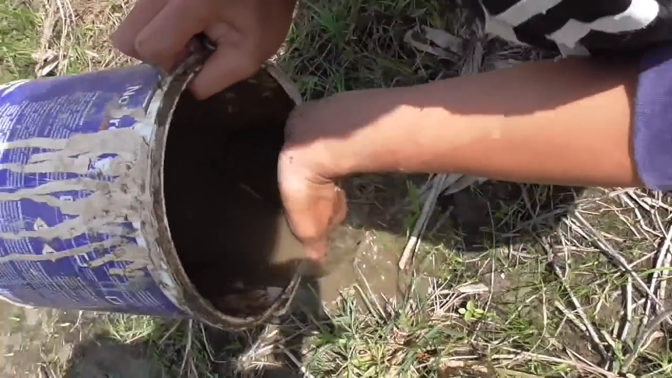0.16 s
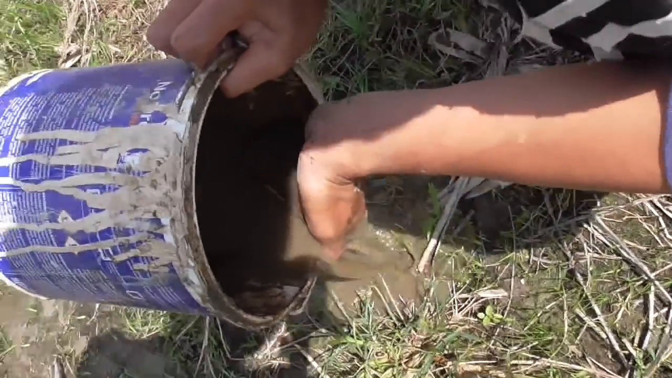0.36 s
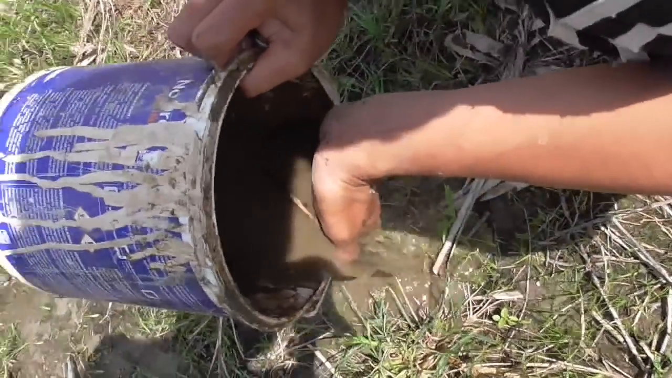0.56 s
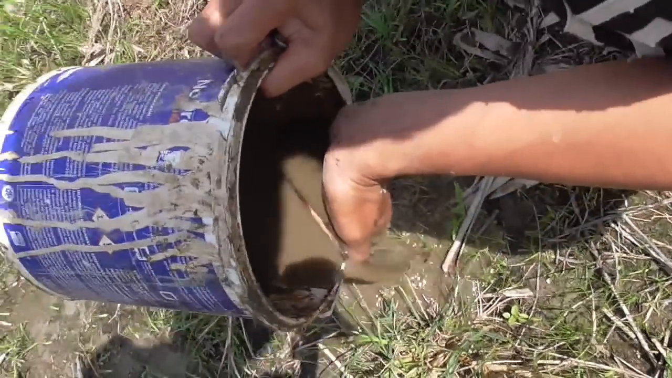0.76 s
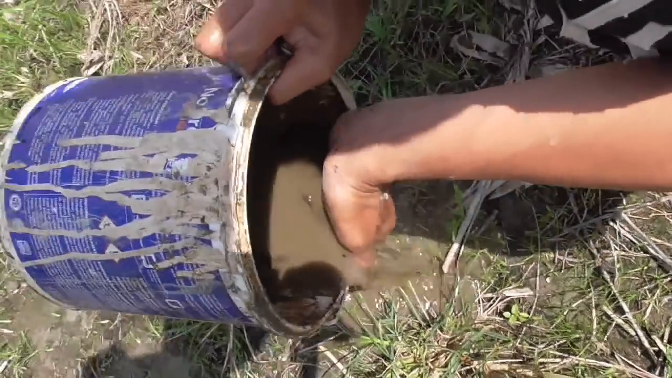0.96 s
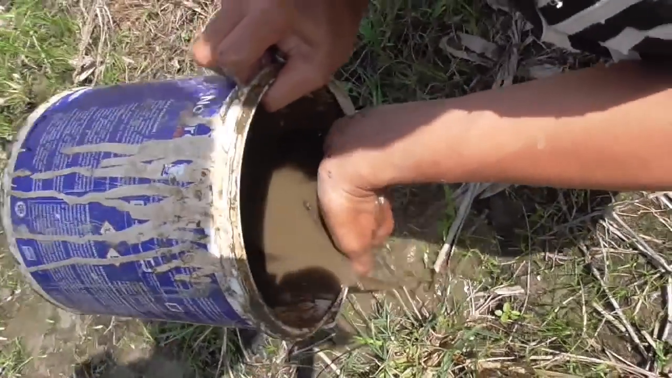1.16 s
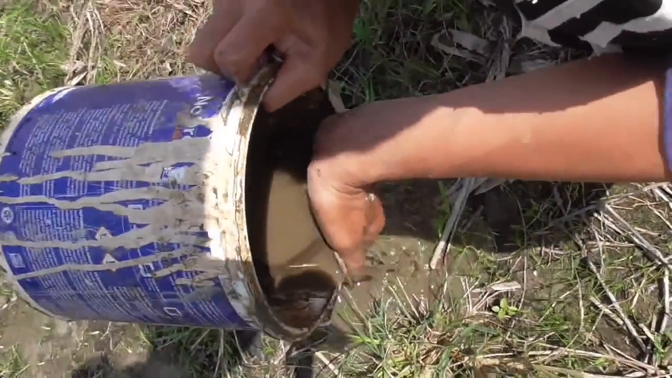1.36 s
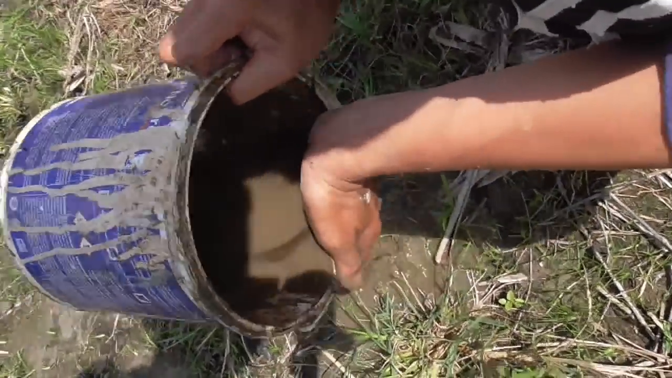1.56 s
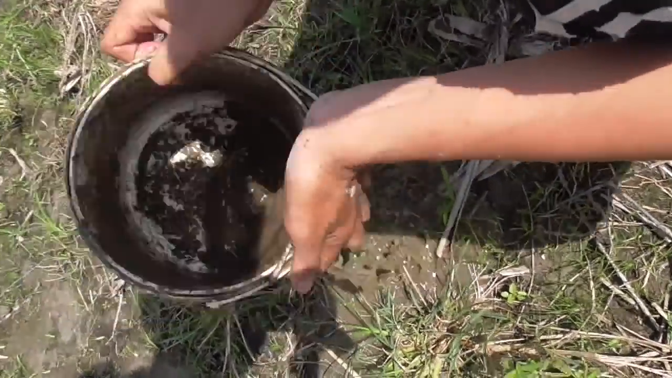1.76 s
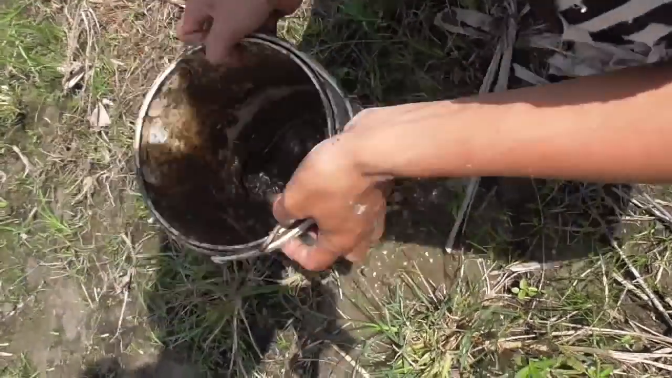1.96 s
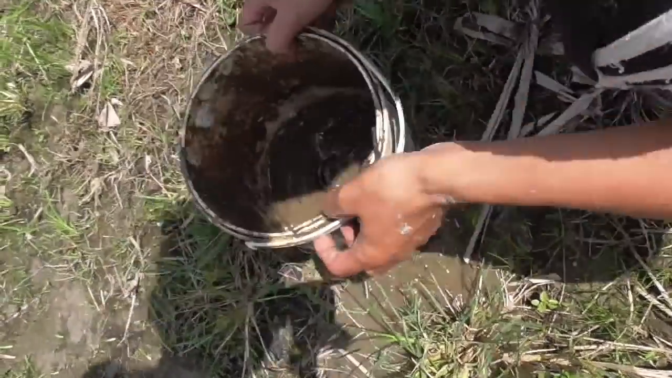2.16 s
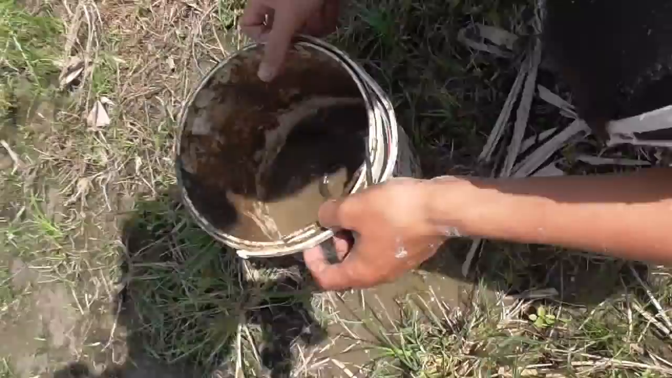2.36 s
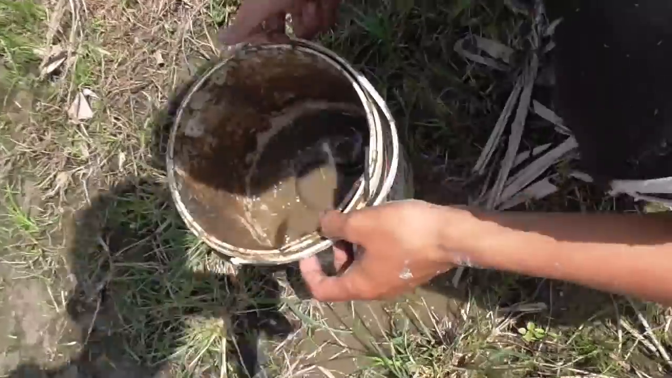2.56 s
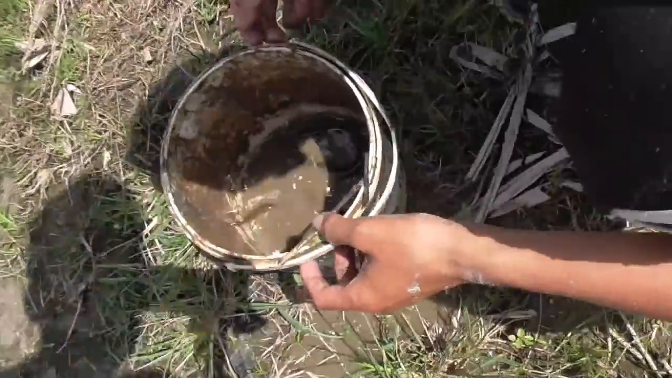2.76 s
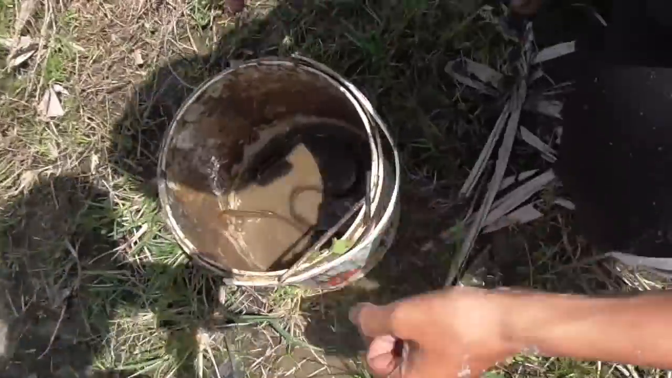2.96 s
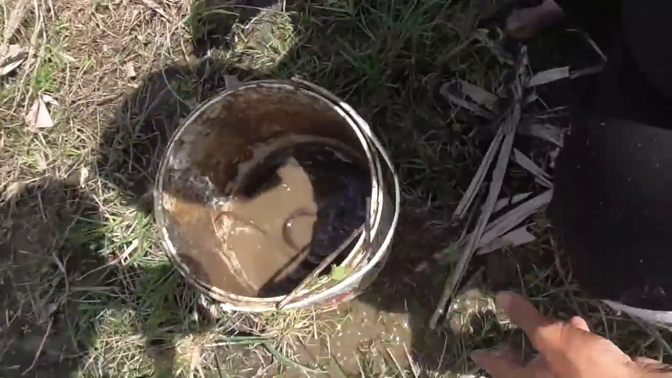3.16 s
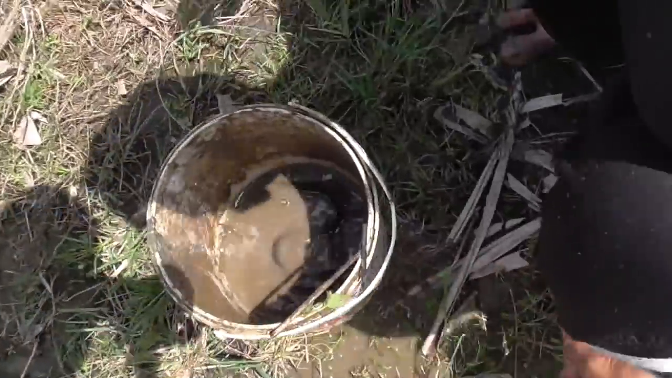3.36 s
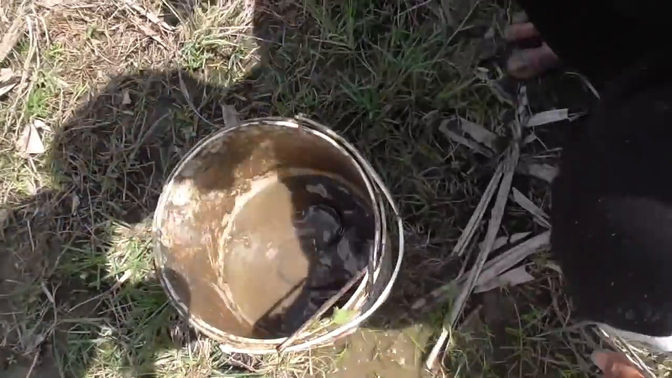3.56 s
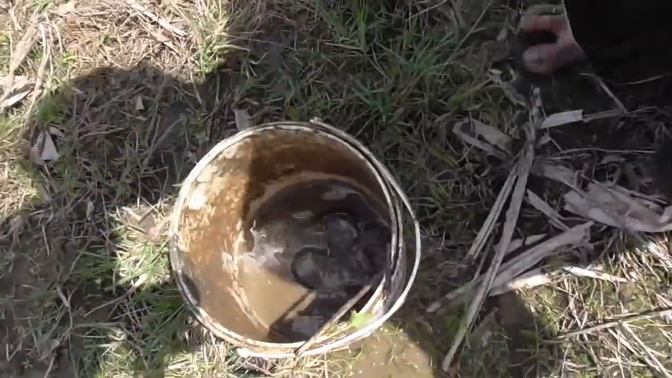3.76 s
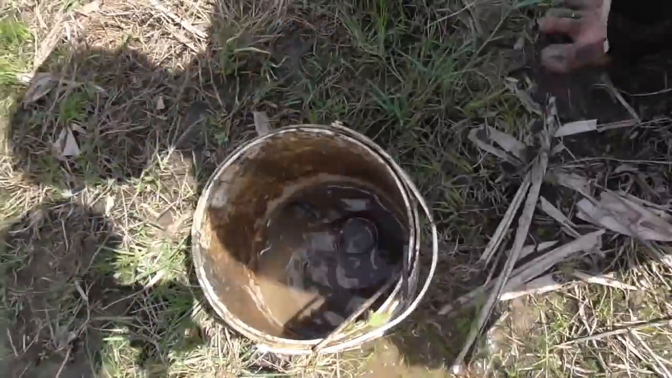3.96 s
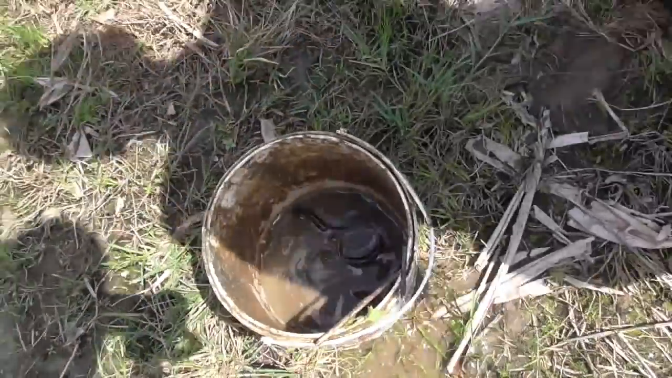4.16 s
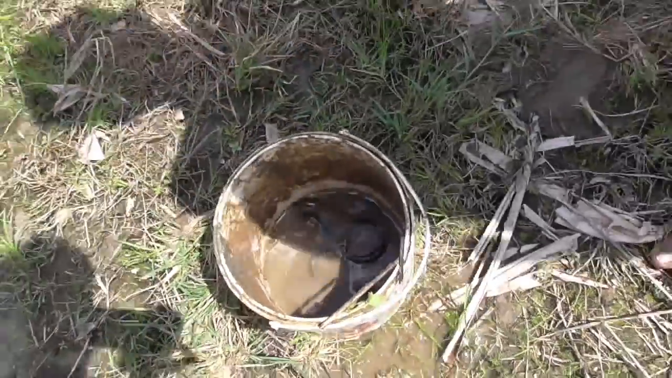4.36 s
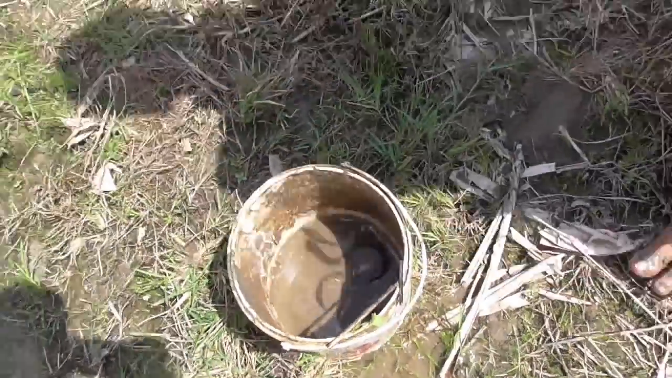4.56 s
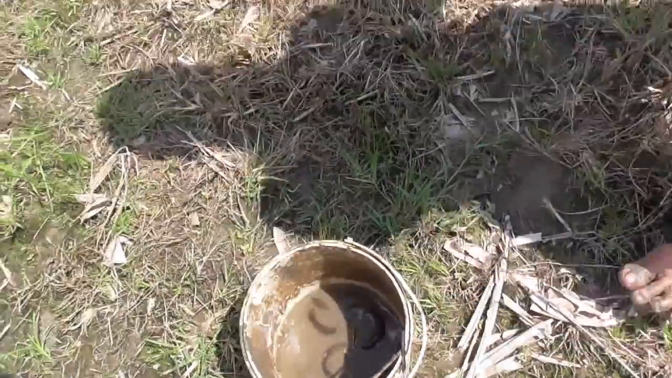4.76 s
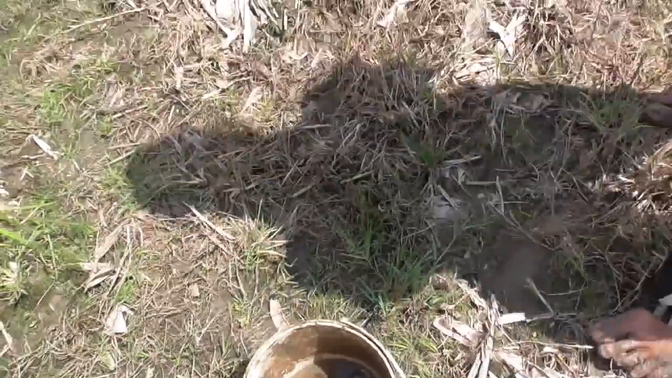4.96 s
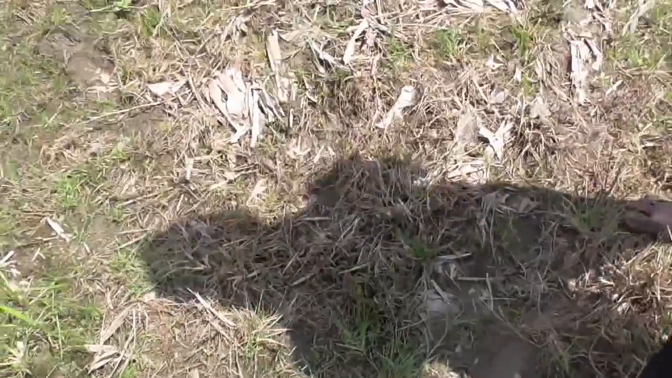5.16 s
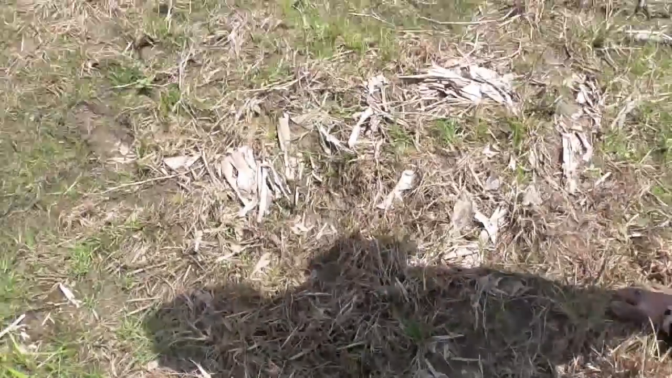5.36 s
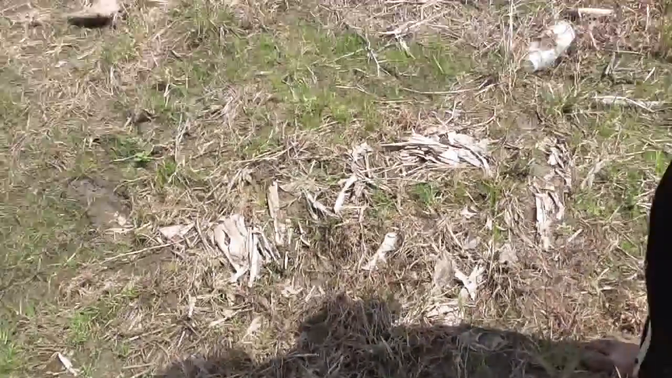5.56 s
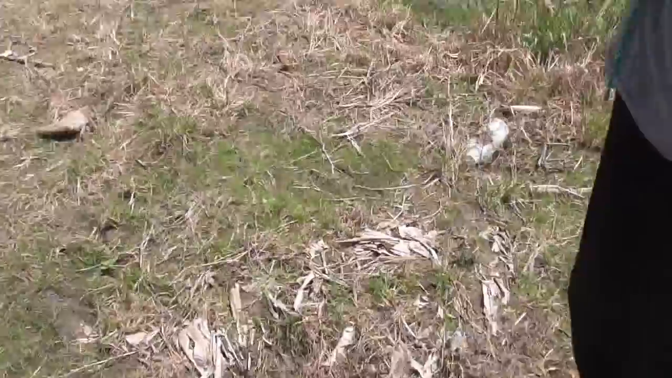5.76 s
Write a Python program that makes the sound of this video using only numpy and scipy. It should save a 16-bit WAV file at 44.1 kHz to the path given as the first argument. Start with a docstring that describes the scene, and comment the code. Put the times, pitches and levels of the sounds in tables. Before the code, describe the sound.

Muddy water pours and spatters from a plastic bucket, sloshes as it is set down with a hollow knock, then clothes rustle.

```python
"""In a field, with an engine droning far away, muddy water is poured from a plastic bucket over a hand.
It spatters on wet ground: drops crack, bubbles ring and the hollow bucket gurgles. Near 2 s the bucket
is righted, its handle slips on the rim, and the water slaps and glugs inside. Among a few last drips it
is set down with a hollow knock at 3.6 s. Then the people get up: clothes rustle, dry stalks crunch
and plastic knocks close by."""
import sys
import numpy as np
from scipy import signal
from scipy.fft import rfft, irfft, next_fast_len
from scipy.io import wavfile
from scipy.ndimage import map_coordinates

SR = 44100
rng = np.random.default_rng(int(sys.argv[2]) if len(sys.argv) > 2 else 0)


def dump_mix(stems):
    """Bounce the given channels to the path in sys.argv[1] as a 16-bit WAV at rate SR."""
    frames = np.atleast_2d(stems).T  # one column per channel
    limited = np.clip(frames, -1, 1)  # hard clip at full scale
    pcm = np.round(limited * 32767).astype(np.int16)
    wavfile.write(sys.argv[1], SR, pcm)


N = 255780
TIME = np.arange(N) / SR


def from_db(db):
    return 10 ** (np.asarray(db) / 20)


def rms_one(x):
    return x / np.sqrt(np.mean(x ** 2) + 1e-20)


def drift(per_s):
    """A random control curve with an RMS of 1 and per_s turning points a second."""
    points = rng.standard_normal(4000)
    return rms_one(np.interp(TIME * per_s, np.arange(len(points)), points))


def butter(x, hz, kind):
    """A gentle low-, high- or band-pass, 12 dB an octave."""
    return signal.sosfilt(signal.butter(2, hz, kind, fs=SR, output="sos"), x)


def eq(x, curve):
    """A minimum-phase EQ along rows of (freq_hz, gain_db), so clicks have no pre-ring."""
    size = next_fast_len(N + 8192)
    hz, db = np.transpose(curve)
    grid_hz = np.maximum(np.arange(size // 2 + 1) * SR / size, 1)
    gain = from_db(np.interp(np.log(grid_hz), np.log(hz), db))
    cepstrum = irfft(np.log(gain), size)
    cepstrum[1:size // 2] *= 2
    cepstrum[size // 2 + 1:] = 0
    return irfft(rfft(x, size) * np.exp(rfft(cepstrum)), size)[..., :N]


def ring(x, hz, t60):
    """One mode: a unit click sets a sine of height 1 ringing."""
    radius = from_db(-60 / (t60 * SR))
    angle = 2 * np.pi * min(hz, .45 * SR) / SR
    return signal.lfilter([0, np.sin(angle)], [1, -2 * radius * np.cos(angle), radius ** 2], x + 1e-18)


def resonance(x, hz, *widths_hz):
    """Band-passes in series, one for each width, with unity gain at the centre."""
    for width in widths_hz:
        radius = np.exp(-np.pi * width / SR)
        poles = [1, -2 * radius * np.cos(2 * np.pi * hz / SR), radius ** 2]
        x = signal.lfilter(np.array([1, 0, -1]) * (1 - radius ** 2) / 2, poles, x + 1e-18)
    return x


def pan(db):
    """Left and right gains for a level difference; positive is to the left."""
    gains = from_db([[db / 2], [-db / 2]])
    return gains / gains.mean()


def wide_noise(side_db, size=N):
    """Mid-side white noise; side_db sets the stereo width."""
    mid, side = rng.standard_normal((2, size))
    return mid + from_db(side_db) * side * [[1], [-1]]


def grains(per_s, spread_db, scatter):
    """Random clicks of uneven size, each with its own pan."""
    at = np.flatnonzero(rng.random(N) < per_s / SR)
    size, sign, side = rng.random((30000, 3))[np.arange(len(at)) % 30000].T
    height = from_db(spread_db * np.minimum(-np.log(1 - size), 3.5)) * np.sign(sign - .5)
    out = np.zeros((2, N))
    out[:, at] = height * (1 + scatter * 2 * (2 * side - 1) * np.array([[1], [-1]]))
    return out


def spurts(per_s, decay_s):
    """An envelope of random bursts, each with a hard attack and a short decay."""
    triggers = np.abs(grains(per_s, spread_db=3.0, scatter=.15))
    return rms_one(signal.lfilter([1], [1, -np.exp(-1 / (decay_s * SR))], triggers + 1e-18))


def swell(crest_s, db, rise_s, fade_s):
    """An envelope with a rounded crest between a gradual rise and fall."""
    distance = np.abs(TIME - crest_s) / np.where(TIME < crest_s, rise_s, fade_s)
    return from_db(db) / np.cosh(np.minimum(distance, 40))


def wander(x, octaves, per_s):
    """Random varispeed: the pitch strays a little up and down."""
    speed = 2 ** (octaves * drift(per_s))
    position = np.cumsum(speed / speed.mean())
    return np.array([map_coordinates(side, [position], order=3, mode="nearest") for side in x])


def add(out, start_s, sound):
    """Mix a sound in at its cue."""
    at = max(int(start_s * SR), 0)
    out[:, at:at + sound.shape[-1]] += sound[..., :N - at]


def reflections(x, t60, wet_db, side_db):
    """Adds short diffuse reflections off the bucket, the ground and the bodies."""
    t = TIME[:4096]
    tail = wide_noise(side_db, len(t)) * from_db(-60 * t / t60) * np.minimum(t / .001, 1)
    tail /= np.sqrt(np.sum(tail ** 2) / 2)
    return x + from_db(wet_db) * signal.fftconvolve(x, tail, axes=1)[:, :N]


# Low bed of open air: freq_hz, gain_db
MURMUR_EQ = [(25, -2), (50, -19), (70, -8.5), (115, -1.5), (190, -1.5), (260, -0.5), (400, -7.5),
             (670, -7.5), (1000, -13.5), (1400, -14.5), (2000, -35), (4000, -38)]
# Thin, airy top: freq_hz, gain_db
HISS_EQ = [(900, -39), (1900, -6.5), (2700, -10), (3500, -5), (4900, -5), (6300, -10.5), (7200, -3.5),
           (7800, 2), (8400, 1), (8900, 5.5), (9400, -3.5), (12500, -4.5), (14500, -11), (16000, -42)]
# Partials of the far engine: pitch_hz, level_db
ENGINE_PARTIALS = [(62, -62), (103, -55.5), (122.5, -50.5), (150.5, -52), (179.5, -51.5), (242, -57.5)]
def field(hiss_fall_s=5.3, hiss_fall_db=-2.5):
    """Open air murmurs, a far engine wavers, and a thin hiss sinks a little at the end."""
    murmur = from_db(-45.5) * rms_one(eq(wide_noise(side_db=-3.0), MURMUR_EQ))
    hiss = from_db(-47.5) * rms_one(eq(wide_noise(side_db=-0.5), HISS_EQ))
    hiss *= from_db(hiss_fall_db * np.clip((TIME - hiss_fall_s) / 0.12, 0, 1))
    drone = 0
    for hz, db in ENGINE_PARTIALS:
        level = from_db(db + 3.0 * drift(12))
        wavering_hz = hz + 3.58 * drift(18)
        drone += level * np.sin(2 * np.pi * np.cumsum(wavering_hz) / SR)
    return (murmur + drone) * pan(-0.66) + hiss


# Stalks crushed underfoot: start_s, level_db, pitch_hz
STALK_CRUNCHES = [(4.622, -27, 8200), (4.671, -23, 9000), (4.684, -23, 8800), (4.742, -29, 10900),
                  (4.792, -32, 10000), (5.193, -30, 10500), (5.288, -33, 10000)]
def stalks(attack_s=0.00088, decay_s=.003, width_hz=2600):
    """A dry stalk gives way with a short, thin crunch."""
    out, t = np.zeros((2, N)), TIME[:2000]
    envelope = np.exp(-t / decay_s) * (1 - np.exp(-t / attack_s))
    for start_s, db, hz in STALK_CRUNCHES:
        crunch = rms_one(resonance(wide_noise(side_db=3, size=len(t)), hz, width_hz, 2 * width_hz))
        add(out, start_s, from_db(db) * crunch * envelope)
    return out


# Tone of rubbing fabric: freq_hz, gain_db
CLOTH_EQ = [(250, -23), (600, 6), (1350, 1), (1900, -2.5), (2700, -2.5), (3700, 2.5), (4800, 0.5),
            (6200, -3), (8500, 0), (12000, -7.5), (15300, -11), (16000, -33)]
# Body moves, fastest at the crest: crest_s, level_db, rise_s, fade_s, crisp_db
CLOTH_MOVES = [(3.57, -41, 0.061, 0.16, -1), (3.769, -45, 0.024, 0.041, 1), (4.26, -42, 0.079, 0.13, 9.5),
               (4.41, -43, 0.028, 0.092, 11.5), (4.515, -38.5, 0.038, 0.038, 10),
               (4.62, -45.5, 0.048, 0.11, 6), (4.88, -44, 0.034, 0.038, 6), (4.95, -41.5, 0.015, 0.019, 0),
               (5.10, -49.5, 0.035, 0.057, -4), (5.212, -38.5, 0.016, 0.023, 4),
               (5.255, -41.5, 0.02, 0.036, 6)]
def clothes(crisp_hz=9000, flutter_db=1.0, snag_db=-7):
    """Cloth slides on cloth: a hiss swells with each move, some crisper, and snagging fibres tick."""
    rub_power = crisp_power = 0
    for crest_s, db, rise_s, fade_s, crisp_db in CLOTH_MOVES:
        rub_power += swell(crest_s, db, rise_s, fade_s) ** 2
        crisp_power += swell(crest_s, db + crisp_db, rise_s, fade_s) ** 2
    hiss = rms_one(eq(wide_noise(side_db=-4.0), CLOTH_EQ))
    top = signal.sosfiltfilt(signal.butter(2, crisp_hz, "high", fs=SR, output="sos"), hiss)
    ticks = wide_noise(side_db=-3.5) * spurts(per_s=120, decay_s=.0006)
    snags = from_db(snag_db) * rms_one(eq(ticks, SPATTER_EQ))
    rustle = np.sqrt(rub_power) * (hiss + snags) + np.sqrt(crisp_power) * top
    return rustle * from_db(flutter_db * drift(80))


# Body modes of the plastic: pitch_hz, gain_db, t60_s
PLASTIC_MODES = [(262, -8.5, 0.059), (360, -16, 0.11), (610, -4.5, 0.048), (699.4, -13.5, 0.11),
                 (895, -10.5, 0.11), (1200, -8, 0.019), (1365, -5.5, 0.049), (1310, 1, 0.0052),
                 (1770, -25, 0.028), (2300, 10, 0.0059), (4360, -17, 0.011)]
# Hits on plastic: start_s, level_db, contact_hz, pan_db, ring_db, t60_ratio
PLASTIC_HITS = [(3.6146, 1.5, 1400, -7.5, 6, 0.26), (3.6203, -2.5, 1640, -10, -3.5, 0.83),
                (3.6264, -4, 1350, 3, -32, 0.5), (3.853, -25, 975, -8, 2, 0.69),
                (4.055, -20, 476, -5, 2, .6), (4.125, -16.5, 1010, -9, 3.5, 0.46),
                (4.61, -23.5, 660, -5, 5, 1), (4.6817, -16.5, 700, -2, 4, 0.76),
                (4.7352, -11, 1290, -7, -0.5, 0.73), (4.844, -10, 744, -10.5, 3, 0.83),
                (4.8456, -12, 1340, -9, -1.5, 0.44), (4.971, -22, 790, -6, 2.5, 1.8)]
def knocks(contact_t60=0.0094, body_db=-7, contact_db=-1, crack_db=-23, left_lag_s=.00007):
    """A short contact pulse, duller when soft, sets the plastic ringing; hard blows add a crack."""
    out, t = np.zeros((2, N)), TIME[:12000]
    click = signal.unit_impulse(len(t))
    for start_s, db, hz, pan_db, ring_db, t60_ratio in PLASTIC_HITS:
        pulse = butter(click, 0.71 * hz, "low")
        body = sum((-1) ** k * from_db(mode_db) * ring(pulse, mode_hz, t60_ratio * t60)
                   for k, (mode_hz, mode_db, t60) in enumerate(PLASTIC_MODES))
        contact = butter(ring(click, hz, contact_t60), 2500, "low")
        crack = rms_one(resonance(rng.standard_normal(len(t)), 1400, 2100)) * np.exp(-t / 0.0075)
        hit = from_db(body_db + ring_db) * body + from_db(contact_db) * contact
        hit += from_db(crack_db + db) * crack
        add(out, start_s, from_db(db) * hit * pan(pan_db))
    out = butter(out, 180, "high")
    out[0] = np.interp(TIME - left_lag_s, TIME, out[0])
    return reflections(out, t60=.11, wet_db=-11, side_db=-6)


# Hollow resonances of the rim: pitch_hz, width_hz, gain_db
RIM_MODES = [(1260, 140, -5.5), (2110, 160, -1.5), (3500, 1200, -4.5), (4960, 240, -4), (6800, 440, -6)]
# Handle slips as the bucket is righted: start_s, level_db, decay_s
HANDLE_SLIPS = [(1.923, -38, 0.021), (1.9475, -21.5, 0.0028), (1.957, -26, .008)]
def handle(attack_s=0.00032):
    """The handle slips on the rim: each short, gritty scrape excites the same resonances."""
    slips, t = np.zeros((2, N)), TIME[:6000]
    for start_s, db, decay_s in HANDLE_SLIPS:
        envelope = np.exp(-t / decay_s) * (1 - np.exp(-t / attack_s))
        add(slips, start_s, from_db(db) * wide_noise(side_db=-8, size=len(t)) * envelope)
    return sum(from_db(db) * np.sqrt(SR / width) * resonance(slips, hz, width, 2 * width)
               for hz, width, db in RIM_MODES)


# Hollow tone of water in the bucket: freq_hz, gain_db
SWIRL_EQ = [(120, -30.5), (250, -4.5), (350, -7.5), (470, 4), (580, -5), (720, -2.5), (1000, -9),
            (1300, -12.5), (1800, -23), (3000, -26.5)]
# Waves as the bucket is moved: crest_s, level_db, rise_s, fade_s
BUCKET_WAVES = [(.05, -38.5, 0.2, 0.14), (2.2, -41, 0.29, 0.49), (2.98, -45, 0.079, 0.22),
                (3.6, -36.5, 0.13, 0.17), (4.68, -46, 0.061, 0.34)]
def swirl(pour_wash_db=-52.5):
    """Thick water washes softly round the bucket, during the pour and with each wave."""
    flow_db, gate = flow()
    pouring = from_db(pour_wash_db + flow_db) * gate
    envelope = np.sqrt(pouring ** 2 + sum(swell(*wave) ** 2 for wave in BUCKET_WAVES))
    lumps = from_db(1.3 * drift(35))
    wash = rms_one(eq(wide_noise(side_db=-8.5), SWIRL_EQ))
    return wash * envelope * lumps * pan(-4.0)


# Hollow glugs and thumps of the bucket: start_s, level_db, pitch_hz, t60_s, thump_db, pan_db
BUCKET_GLUGS = [(1.8485, -17.5, 860, 0.0098, -31, 4), (1.853, -24.5, 410, 0.055, -30, 3),
                (2.0962, -7, 550, 0.016, -52, 2.5), (2.544, -21.5, 674, 0.06, -39, -6),
                (2.549, -10.5, 734, 0.0083, -41, -6), (3.9696, -1.5, 440, 0.016, -19, -4)]
def glugs(attack_s=0.00047, chirp_per_s=0.83, thump_hz=95, band_hz=(70, 1500)):
    """A large air pocket rings briefly, rising a little, over a dull thump."""
    out, t = np.zeros((2, N)), TIME[:4000]
    attack = 1 - np.exp(-t / attack_s)
    for start_s, db, hz, t60, thump_db, pan_db in BUCKET_GLUGS:
        tone = np.sin(2 * np.pi * hz * t * (1 + chirp_per_s * t)) * from_db(-60 * t / t60)
        thump = from_db(thump_db) * np.sin(2 * np.pi * thump_hz * t) * np.exp(-t / 0.0037)
        add(out, start_s, from_db(db) * (tone + thump) * attack * pan(pan_db))
    return reflections(butter(out, band_hz, "band"), t60=.06, wet_db=-16, side_db=-10)


def wet_mud(start_s=2.1, db=-49, rise_s=0.19, fade_s=1.0):
    """The soaked mud crackles with faint, sparse ticks after the pour."""
    crackle = rms_one(eq(grains(per_s=60, spread_db=3.5, scatter=0.38), SPATTER_EQ))
    age_s = np.maximum(TIME - start_s, 0)
    envelope = np.minimum(age_s / rise_s, 1) * np.exp(-age_s / fade_s)
    return crackle * from_db(db) * envelope * pan(-0.82)


# Tone of a slap's spray: freq_hz, gain_db
SLAP_EQ = [(300, -8.5), (800, -10), (2000, -7), (3700, -11), (5100, -23), (5600, -23), (9000, 0),
           (15000, -14)]
# Water slapping the bucket wall: crest_s, level_db, rise_s, decay_s, bubble_hz
WALL_SLAPS = [(.57, -26, .003, 0.0033, 4300), (.665, -38, 0.028, 0.017, 4800),
              (0.716, -34, 0.0068, 0.017, 4730), (0.996, -31, 0.0097, 0.0099, 3850),
              (1.072, -29, 0.00089, 0.0033, 3900), (1.184, -32.5, 0.0034, 0.005, 2200),
              (1.2086, -21.5, 0.00076, .003, 4700), (1.6848, -25, 0.00038, 0.0016, 4730),
              (1.851, -25, 0.0014, 0.014, 805), (1.877, -27, 0.0013, 0.0019, 4540),
              (1.941, -26, 0.018, 0.021, 3460), (1.9493, -17.5, 0.00073, 0.0029, 990),
              (2.05, -25.5, 0.0012, 0.0022, 5050), (2.0805, -21.5, 0.00095, 0.0054, 6100),
              (2.092, -31.5, 0.011, 0.015, 3400), (2.096, -29, 0.0011, 0.0051, 1250),
              (2.199, -29, 0.002, 0.0034, 4200), (2.201, -25.5, 0.002, 0.0022, 2120),
              (2.227, -32, 0.0036, 0.003, 6100), (2.248, -36, .001, 0.0024, 3600)]
def slaps(spray_db=-3, bubble_db=-2, lead_s=.08):
    """A wave folds against the wall: a burst of spray and a cluster of bubbles."""
    out, t = np.zeros((2, N)), TIME[:8000] - lead_s
    spray = rms_one(eq(grains(per_s=2300, spread_db=-1.0, scatter=0.37), SLAP_EQ))
    for crest_s, db, rise_s, decay_s, hz in WALL_SLAPS:
        at = int((crest_s - lead_s) * SR)
        bubbles = rms_one(resonance(wide_noise(side_db=-11, size=len(t)), hz, 0.32 * hz, 0.5 * hz))
        splash = from_db(spray_db) * spray[:, at:at + len(t)] + from_db(bubble_db) * bubbles
        envelope = np.exp(-np.maximum(-t / rise_s, t / decay_s))
        add(out, crest_s - lead_s, from_db(db) * envelope * splash)
    return out * pan(0.77)


# Larger bubbles in the puddle or the bucket: start_s, level_db, pitch_hz, t60_s
BUBBLE_BLIPS = [(0.038, -34, 1310, 0.027), (0.262, -32, 1190, 0.041), (0.303, -32, 1194, 0.025),
                (0.3327, -33.5, 1143, 0.025), (0.384, -28, 4700, 0.019), (0.417, -24, 4500, .014),
                (0.4347, -32.5, 1180, .03), (0.481, -24, 4500, 0.011), (.495, -31, 4100, .014),
                (.536, -26.5, 2070, 0.023), (.637, -28.5, 3150, 0.022), (0.681, -35, 1180, 0.027),
                (0.721, -35, 1200, 0.018), (0.737, -35, 1120, 0.025), (0.873, -37.5, 1220, .03),
                (0.981, -26, 2930, 0.018), (.9926, -35.5, 1080, 0.042), (1.354, -33.5, 2370, .014),
                (1.486, -36, 1150, .03), (1.5205, -32, 1110, 0.023), (1.576, -34.5, 1196, 0.049),
                (1.9268, -23, 3700, .014), (1.9616, -21, 2040, .022), (2.0863, -18, 2360, 0.011),
                (2.0912, -20.5, 1985, 0.015)]
def blips(attack_share=0.075, chirp_per_s=1.36, froth_gain=0.61):
    """A bursting bubble swells and rings briefly, a little unsteadily, and rises in pitch."""
    out, t = np.zeros((2, N)), TIME[:2500]
    for start_s, db, hz, t60 in BUBBLE_BLIPS:
        envelope = from_db(-60 * t / t60) * (1 - np.exp(-t / (attack_share * t60)))
        tone = np.sin(2 * np.pi * hz * t * (1 + chirp_per_s * t))
        froth = froth_gain * rms_one(resonance(rng.standard_normal(len(t)), hz, 230))
        blip = rms_one(tone + froth) / np.sqrt(2)
        add(out, start_s, from_db(db) * envelope / envelope.max() * blip)
    return out


def small_drops(per_s=22, db=-12.5, spread_db=4.5, hz=11300, spread_oct=.12):
    """The stream sheds drops unevenly, weaker as it thins: rows of (start_s, level_db, pitch_hz)."""
    jitter, size, pitch = rng.uniform(-1, 1, (200, 3)).T
    start_s = (np.arange(len(jitter)) + 1 + jitter) / per_s
    level_db = db + np.interp(start_s, TIME, flow()[0]) + np.sqrt(3) * spread_db * size
    pitch_hz = hz * 2 ** (np.sqrt(3) * spread_oct * pitch)
    return list(np.transpose([start_s, level_db, pitch_hz])[start_s < WATER_CURVE[-1][0]])


# The biggest drops on the mud, then the last drips: start_s, level_db, pitch_hz
BIG_DROPS = [(.0083, -4.5, 10450), (.0388, -9, 11100), (0.052, -9, 9100), (0.055, -1, 9900),
             (0.0673, -7, 9900), (0.0748, -3, 7800), (0.1287, -9.5, 11400), (0.14, -11, 9700),
             (0.1725, -7, 9150), (0.1925, -11, 11200), (0.2036, -18, 7450), (.219, -11.5, 10600),
             (0.241, -13, 10100), (.2503, -14, 9400), (.2631, -4.5, 11500), (0.2685, -9, 10400),
             (.288, -11.5, 10300), (0.3182, -4, 11600), (.334, -9, 9800), (.336, 1.5, 9600),
             (.3385, -16, 9500), (.3545, -24, 10400), (0.3625, -9, 8300), (0.3661, -13, 9000),
             (0.374, -11, 12000), (0.4012, -11, 9500), (0.403, -8, 10300), (.41, -5, 10100),
             (0.4196, -11, 9800), (0.483, -8, 11100), (0.49, -5.5, 11600), (.524, -11, 10200),
             (0.533, -13, 9800), (0.546, -6, 9700), (0.555, -14, 9200), (.5631, -16, 8850),
             (0.5682, -13, 8450), (0.6016, -4.5, 7660), (0.6233, -4, 10600), (.6405, -14, 7000),
             (.6535, -10, 9500), (.6622, -7, 10500), (0.673, -16, 11100), (0.723, -7, 8600),
             (0.7629, 1, 6860), (.7715, -20, 8400), (0.8445, -9, 8150), (0.847, -12, 10700),
             (0.8555, -18, 9300), (0.882, -5, 10900), (0.8997, -7, 9400), (.9075, -15, 12300),
             (0.9363, -8.5, 9100), (.9532, -10, 7800), (0.9602, -9, 8560), (1.0374, -3.5, 6160),
             (1.0533, -14, 11900), (1.0707, -11, 9050), (1.105, -5, 9400), (1.1834, -7.5, 6200),
             (1.1885, -17, 9700), (1.205, -2, 10700), (1.208, -3, 8800), (1.2108, -5.5, 6740),
             (1.214, -6, 9100), (1.2334, -13, 10100), (1.285, -10, 8600), (1.348, -9.5, 9400),
             (1.354, -8.5, 7650), (1.381, -7, 10100), (1.384, -8.5, 8440), (1.4005, -10.5, 9400),
             (1.4783, -3, 9400), (1.5569, 2, 8100), (1.612, -14, 8900), (1.62, -14, 11800),
             (1.6396, -4, 11200), (1.711, -7, 10700), (1.7322, -1, 7860), (1.735, -8, 8100),
             (1.7573, -8, 9850), (1.7942, -8, 8760), (1.8005, -7, 8900), (1.8852, 0, 8400),
             (1.8947, -11, 10700), (1.9231, -12, 9000), (1.9513, -6, 8900), (2.002, -6.5, 10200),
             (2.049, -8.5, 11400), (2.123, -8.5, 10200), (2.249, -26, 8700), (2.391, -29, 9100),
             (2.429, -27, 10000), (2.451, -21, 12600), (2.521, -21, 8300), (2.658, -22, 11300),
             (2.683, -37, 8900), (2.771, -29, 10400), (2.902, -32, 12000), (3.025, -20.5, 10200),
             (3.129, -29, 10100), (3.196, -28, 11000), (3.318, -28, 11000), (3.346, -29, 11000),
             (5.709, -26, 13200)]
def drops(attack_s=0.0001, crack_s=0.0005, spray_db=-20, spray_s=0.002,
          bubble_t60=0.0025, bubble_db=-6, centre_hz=7600, pan_db_per_oct=-4.5):
    """Each drop cracks on the surface, throws a little spray and rings a tiny bubble."""
    out, t = np.zeros((2, N)), TIME[:500]
    attack = 1 - np.exp(-t / attack_s)
    spray_tail = from_db(spray_db) * np.exp(-t / spray_s)
    for start_s, db, hz in BIG_DROPS + small_drops():
        decay = np.exp(-t / crack_s * (hz / centre_hz) ** 2)   # big, low drops crack for longer
        burst = wide_noise(side_db=-5.0, size=len(t)) * attack * (decay + spray_tail)
        crack = resonance(burst, hz, 2560)
        bubble = np.sin(2 * np.pi * hz * t) * from_db(-60 * t / bubble_t60) * attack
        drop = rms_one(crack) + from_db(bubble_db) * rms_one(bubble)
        pan_db = pan_db_per_oct * np.log2(hz / centre_hz)   # finer drops land further right
        add(out, start_s, drop / np.abs(drop).max() * from_db(db) * pan(pan_db))
    return reflections(eq(out, SPATTER_EQ), t60=.016, wet_db=-11, side_db=-6)


# How hard the falling water runs and spatters: time_s, level_db
WATER_CURVE = [(0, -28), (.29, -32), (.33, -38.5), (.39, -25.5), (.54, -24), (.68, -27), (.83, -29.5),
               (.88, -29), (1.0, -27.5), (1.19, -28.5), (1.32, -33), (1.4, -27), (1.46, -33), (1.6, -28),
               (1.67, -38.5), (1.71, -35), (1.775, -38.5), (1.83, -29.5), (1.9, -30), (2.04, -39.5),
               (2.2, -32), (2.33, -61)]
def flow(full_flow_db=-26, close_s=.1):
    """Strength of the falling water in dB relative to full flow, and a gate that shuts as it stops."""
    time_s, level_db = np.transpose(WATER_CURVE)
    gate = np.clip((time_s[-1] - TIME) / close_s, 0, 1)
    return np.interp(TIME, time_s, level_db) - full_flow_db, gate


# Resonances of the bucket's cavity: pitch_hz, width_hz, level_db
BUCKET_RESONANCES = [(205, 180, 7.5), (1116, 500, 5), (1580, 85, -1.5), (2150, 510, 7), (3106, 340, 10),
                     (3970, 300, -11), (4750, 600, 11.5), (5770, 400, -2), (6580, 350, 11)]
def gurgle(blobs):
    """The bucket's hollow resonances gurgle in spurts under the pour, wavering slightly in pitch."""
    cavity = 0
    for hz, width, db in BUCKET_RESONANCES:
        puffs = wide_noise(side_db=-11) * (spurts(per_s=85, decay_s=.0022) + .3 * blobs + .2)
        mode = rms_one(resonance(puffs, hz, 0.33 * width, 3 * width))
        cavity += from_db(db) * wander(mode, octaves=.05, per_s=30)
    return rms_one(cavity)


# Bright tone of water on mud, shared by drops, wet mud and cloth snags: freq_hz, gain_db
SPATTER_EQ = [(1400, -46), (2150, 4), (2550, -22), (3100, -13), (3550, -5.5), (4100, -5.5), (4700, -3.5),
              (5400, -4), (6100, -7), (6700, -4), (7100, -3), (7800, 3.5), (9000, 2), (10200, -0.5),
              (12200, 1.5), (15000, -8), (16000, -17)]
def spatter(blobs):
    """Each blob of water lands as a burst of fine ticks across the treble."""
    ticks = 0
    for hz in np.geomspace(3200, 14000, 8):
        bursts = spurts(per_s=80, decay_s=.0011) + .55 * blobs + .12
        ticks += rms_one(resonance(wide_noise(side_db=-7.5) * bursts, hz, 0.26 * hz)) * np.sqrt(hz)
    ticks = reflections(ticks, t60=.016, wet_db=-8, side_db=-8)
    return rms_one(eq(ticks, SPATTER_EQ))


def stream(spatter_db=-28.5, gurgle_db=-38.5, gurgle_follow=0.52, righted_s=2.06, fade_s=0.6):
    """The stream breaks into spattering blobs; the bucket's gurgle dies away once it is righted."""
    flow_db, gate = flow()
    blobs = spurts(per_s=130, decay_s=.0005)
    spatter_level = from_db(spatter_db + flow_db) * gate
    dying = np.exp(-np.maximum(TIME - righted_s, 0) / fade_s)
    gurgle_level = from_db(gurgle_db + gurgle_follow * flow_db) * dying
    return spatter(blobs) * spatter_level * pan(-1.4) + gurgle(blobs) * gurgle_level


def scene():
    """The pour up front, bucket and body foley around it, the field behind."""
    pour = stream() + blips() + drops()
    foley = slaps() + handle() + wet_mud() + glugs() + swirl() + knocks() + clothes() + stalks()
    return pour + foley + field()


def record(dry, low_cut_hz=45, high_cut_hz=15700):
    """The microphone thins the deep bass, peaks clip at full scale and the top is cut steeply."""
    clipped = np.clip(butter(dry, low_cut_hz, "high"), -1, 1)
    return signal.sosfilt(signal.ellip(10, .2, 70, high_cut_hz, fs=SR, output="sos"), clipped)


dry = scene()
out = record(dry)
dump_mix(out)
```